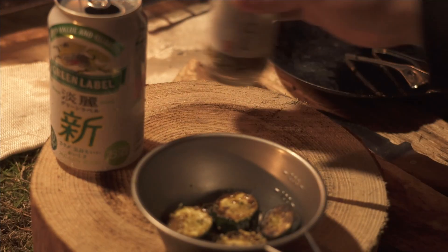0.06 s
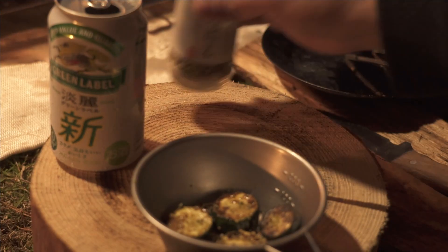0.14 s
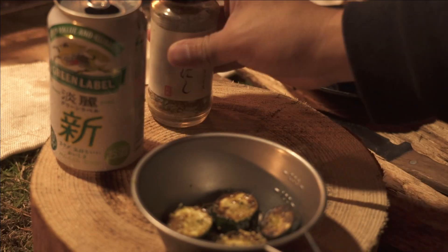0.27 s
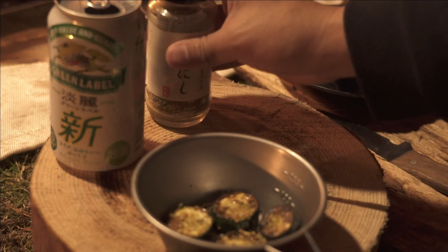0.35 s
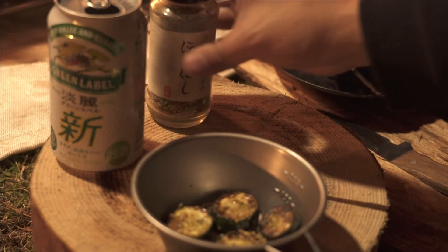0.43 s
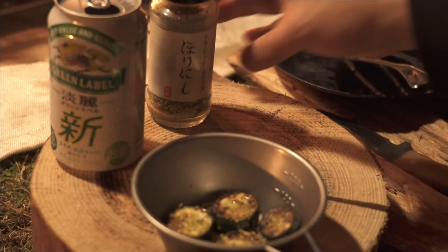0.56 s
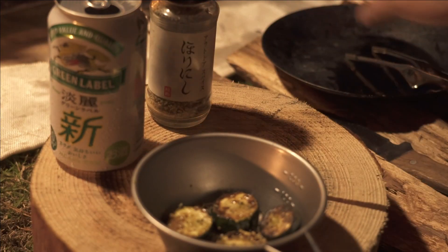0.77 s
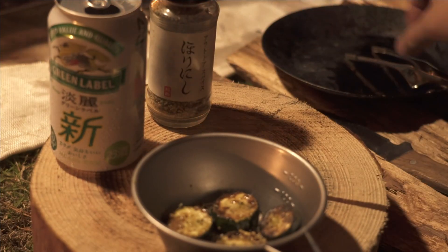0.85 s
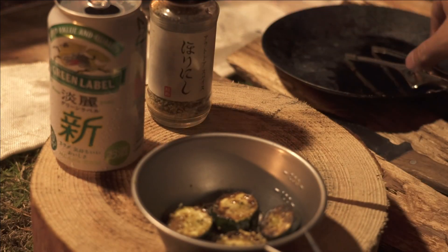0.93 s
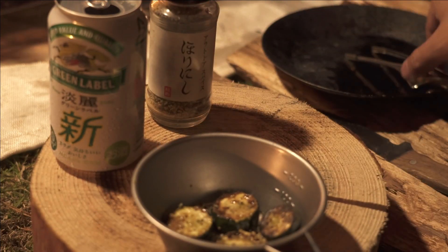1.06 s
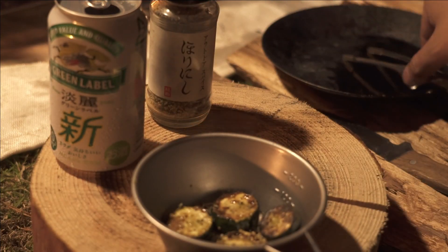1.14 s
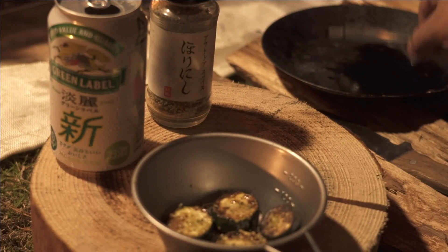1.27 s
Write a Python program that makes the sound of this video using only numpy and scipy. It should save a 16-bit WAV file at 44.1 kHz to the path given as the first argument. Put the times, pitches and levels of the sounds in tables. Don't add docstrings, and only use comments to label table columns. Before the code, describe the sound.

A glass spice jar is set down hard on a wooden log slice, then steel tongs clink softly

```python
import sys
import numpy as np
from scipy import signal
from scipy.fft import rfft, irfft, next_fast_len
from scipy.io import wavfile
from scipy.ndimage import map_coordinates

SR = 44100
rng = np.random.default_rng(int(sys.argv[2]) if len(sys.argv) > 2 else 0)


def nominal_scale(level):
    x = np.asarray(level, float) / 20
    return 10 ** x


def master_out(mix):
    frames = np.transpose(np.atleast_2d(mix))
    ceiling = np.clip(frames, -1, 1)
    pcm = np.round(ceiling * 32767).astype(np.int16)
    wavfile.write(sys.argv[1], SR, pcm)


N = 57330
CLOCK_S = np.arange(N) / SR

# f/Hz, density/dB
HISS_SPECTRUM = [(300, -19), (400, -1.5), (850, -3), (2200, -7.5), (4500, -9.5), (6500, -6), (10000, -16.5),
                 (15750, -26.5)]
# f/Hz, density/dB
RUMBLE_SPECTRUM = [(12, -18), (20, 2), (75, -2), (97, -3), (123, -4), (229, -6.5), (265, -10.5),
                   (500, -20.5), (650, -53), (1100, -120)]
HISS_DB, RUMBLE_DB = -49, -45.5

# t/s, level/dB, f/Hz
SPICE_TICKS = [
    (0.207, -32, 5020),
    (.2110, -33, 7900),
    (.748, -43, 4540),
]
TICK_T60_S = 0.012
JAR_S, JAR_DB = .24253, 5.5
PUSH_HZ, PUSH_MID_S, SWELL_S, FADE_S = 1380, .0009, .00027, .00037
GROUND_DELAY_S, GROUND_DB = .0056, -14
# delay/s, level/dB, signed gain/1
PUSH_RETURNS = [
    (.00062, -23.5, -0.17),
    (.0014, -25.5, -0.94),
    (.0030, -22, -1.3),
    (.0070, -19, -1.2),
    (.0081, -23, -1.1),
    (.0112, -23, -1.2),
    (.0139, -22, -1.2),
]
# f/Hz, level/dB, t60/s
LOG_MODES = [(435, -6, .08), (588, -7, .08), (778, -2, .055), (940, -10, .05), (1182, -3, .047),
             (1335, -8, .055), (1545, -4, .045), (1895, -8, .042), (2057, -8, .036), (2400, -10, .03),
             (2620, -12, .05), (3757, -12, .03), (4980, -20, .012)]
LOG_DB, LOG_RISE_S = -17, .0012
# f/Hz, density/dB
SCATTER_SPECTRUM = [(330, -40), (400, -17), (800, -5.5), (1500, 2), (2500, -7), (3100, -11.5),
                    (4200, -13.5), (7000, -35)]
SCATTER_DB, SCATTER_T60_S = -22.5, 0.059
FAR_DB, FAR_T60_S = -38.5, 0.22

# f/Hz, level/dB, t60/s
GRIP = [(770, 0, 0.15), (1387, -10.5, 0.24), (2470, -5, .08), (2656, 1, .085), (5500, 1, .06),
        (5400, -11, 0.093), (7250, -5, .06), (7540, -8, 0.076), (8290, -4, 0.077), (1980, -7, .08),
        (3230, -9, 0.088)]
# f/Hz, level/dB, t60/s
ARM = [(726, -7, 0.1), (2223, -7.5, .1), (3231, 1.5, 0.11), (7020, -8, 0.092), (3900, -19, .04)]
# f/Hz, level/dB, t60/s
TIP = [(2750, -2.5, 0.043), (6910, 7.5, 0.061), (8420, -5, 0.043), (9250, -5.5, 0.062), (11400, -16, .05),
       (13500, -12, .05)]
# f/Hz, level/dB, t60/s
HINGE = [(5380, 3, 0.12), (5330, -4, 0.054), (5540, -4, 0.047), (7158, -7, 0.14), (7800, -6, 0.071)]
# f/Hz, level/dB, t60/s
SPRING = [(5220, -1, 0.13), (651, 1.5, 0.047), (3960, -1, 0.056)]
# f/Hz, level/dB, t60/s
PAN = [(1140, -11.5, 0.33), (1407, -11, 0.39), (2024, -13.5, 0.34), (2676, -7.5, 0.17), (4447, -2.5, 0.11),
       (6170, -1.5, 0.13), (5750, -5, 0.11), (8270, -13, 0.083)]
# part modes, then list of t/s, level/dB
CONTACTS = [
    (GRIP, [(.937, -43), (.948, -47.5), (.956, -47.5)]),
    (ARM, [(1.075, -45), (1.144, -36), (1.158, -39), (1.164, -48)]),
    (TIP, [(1.074, -46), (1.148, -51), (1.165, -48.5)]),
    (HINGE, [(.947, -57), (1.078, -48), (1.138, -40.5), (1.157, -38), (1.169, -49)]),
    (SPRING, [(.947, -50), (1.124, -56), (1.130, -42), (1.168, -45)]),
    (PAN, [(.955, -60), (.996, -54), (1.145, -47.5), (1.163, -39.5), (1.172, -53.5)]),
]
TAP_SPREAD_DB, TAP_RISE_S = 2, 0.0011
# start/s, length/s, level/dB
RUBS = [
    (0.9358, 0.035, -46),
    (1.073, 0.01, -60),
    (1.128, 0.021, -45),
    (1.150, 0.037, -43.5),
]
# f/Hz, density/dB
GRIT_SPECTRUM = [(400, -6), (800, -1), (1500, -2), (3000, 3.5), (5500, -3), (8000, -3), (12000, -32)]
GRIT_WOBBLE_DB = 3

WHINE_HZ, WHINE_DB = 15735, -83
DUCK_DB, DUCK_S, RECOVER_DB_PER_S = -3.5, 0.0033, 6
CLIP_LEVEL, CLIP_KNEE = 1.0, 16


def unit(x):
    return x / np.sqrt(np.mean(x ** 2) + 1e-20)


def along(points, hz):
    f, v = np.transpose(points)
    return np.interp(np.log(hz + 1), np.log(f + 1), v, left=-60, right=-60)


def noise(spectrum, size):
    m = next_fast_len(size + 8192)
    gain = nominal_scale(along(spectrum, np.fft.rfftfreq(m, 1 / SR)))
    shaped = irfft(rfft(rng.standard_normal(m)) * gain, m)
    return unit(shaped[:size])


def wobble(rate_hz):
    knots = rng.standard_normal(int(N * rate_hz / SR) + 4)
    return map_coordinates(knots, [np.arange(N) * rate_hz / SR])


def ring(modes, t, spread_db):
    hz, level_db, t60_s = np.transpose(modes)[..., None]
    strike_db = level_db + spread_db * rng.standard_normal(hz.shape)
    return np.sum(nominal_scale(strike_db - 60 * t / t60_s) * np.sin(2 * np.pi * hz * t), axis=0)


def add(track, start_s, sound):
    part = track[round(start_s * SR):][:len(sound)]
    part += sound[:len(part)]


def night():
    hiss_db = HISS_DB + 0.75 * wobble(6.5) + 0.7 * wobble(89.54)
    rumble_db = RUMBLE_DB + 1.27 * wobble(8.67)
    return nominal_scale(hiss_db) * noise(HISS_SPECTRUM, N) + nominal_scale(rumble_db) * noise(RUMBLE_SPECTRUM, N)


def spice():
    out, t = np.zeros(N), np.arange(SR // 5) / SR
    rise = 1 - np.exp(-t / LOG_RISE_S)
    for start_s, db, hz in SPICE_TICKS:
        modes = [(hz, 0, TICK_T60_S), (1.09 * hz, -2, TICK_T60_S), (.83 * hz, -3, TICK_T60_S)]
        add(out, start_s, rise * nominal_scale(db) * ring(modes, t, 0))
    return out


def jar():
    out, t = np.zeros(N), np.arange(SR // 5) / SR
    u = t - PUSH_MID_S
    envelope = np.exp(-(u / np.where(u < 0, SWELL_S, FADE_S)) ** 2)
    push = envelope * np.sin(2 * np.pi * PUSH_HZ * u)
    direct_and_ground = [(0, 0, 1), (GROUND_DELAY_S, GROUND_DB, -1)]
    for delay_s, db, sign in direct_and_ground + PUSH_RETURNS:
        add(out, JAR_S + delay_s, sign * nominal_scale(JAR_DB + db) * push)

    rise = 1 - np.exp(-t / LOG_RISE_S)
    add(out, JAR_S + PUSH_MID_S, rise * nominal_scale(LOG_DB) * ring(LOG_MODES, t, 0))
    fade = nominal_scale(SCATTER_DB - 60 * t / SCATTER_T60_S) + nominal_scale(FAR_DB - 60 * t / FAR_T60_S)
    add(out, JAR_S + PUSH_MID_S, rise * fade * noise(SCATTER_SPECTRUM, len(t)))
    return out


def rubs():
    slide = np.zeros(N)
    for start_s, length_s, db in RUBS:
        knots_s = [start_s, start_s + 0.0027, start_s + 0.57 * length_s, start_s + length_s]
        slide += nominal_scale(db) * np.interp(CLOCK_S, knots_s, [0.038, 1, .8, 0.0042])
    return slide * unit(nominal_scale(GRIT_WOBBLE_DB * wobble(350)) * noise(GRIT_SPECTRUM, N))


def taps():
    out, t = np.zeros(N), np.arange(SR // 2) / SR
    rise = 1 - np.exp(-t / TAP_RISE_S)
    for part, hits in CONTACTS:
        for start_s, db in hits:
            add(out, start_s, nominal_scale(db) * ring(part, t, TAP_SPREAD_DB) * rise)
    return out


def scene():
    return (night() + spice() + jar() + rubs() + taps())[None]


def low_pass(x):
    return signal.sosfilt(signal.butter(12, 16320, fs=SR, output="sos"), x)


def record(dry):
    after_s = np.clip(CLOCK_S - JAR_S - 2 * PUSH_MID_S, 0, None)
    gain_db = DUCK_DB * (1 - np.exp(-after_s / DUCK_S)) + RECOVER_DB_PER_S * after_s
    x = dry * nominal_scale(gain_db)
    x = x + nominal_scale(WHINE_DB) * np.sin(2 * np.pi * WHINE_HZ * CLOCK_S)
    x = x / (1 + np.abs(x / CLIP_LEVEL) ** CLIP_KNEE) ** (1 / CLIP_KNEE)
    return low_pass(x)


dry = scene()
out = record(dry)
master_out(out)
```